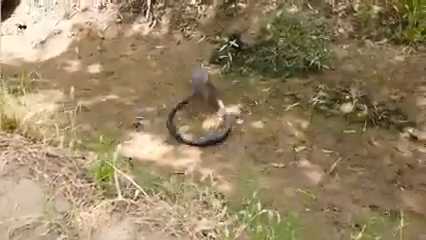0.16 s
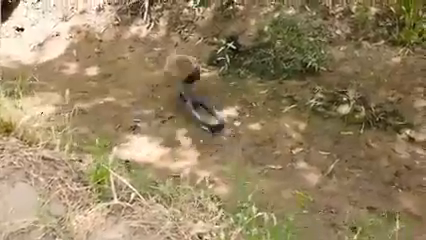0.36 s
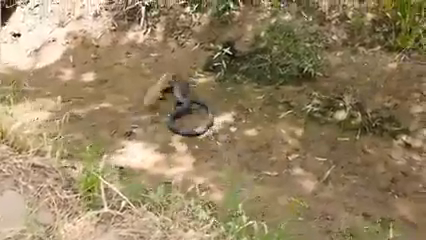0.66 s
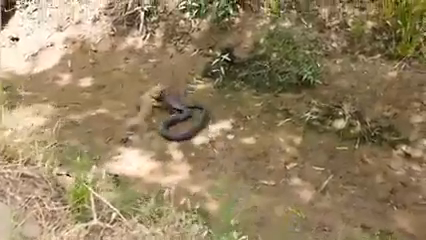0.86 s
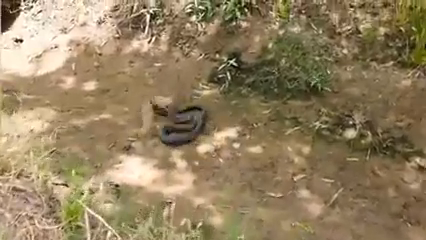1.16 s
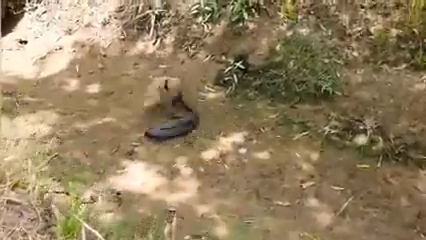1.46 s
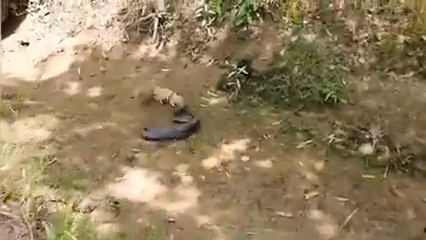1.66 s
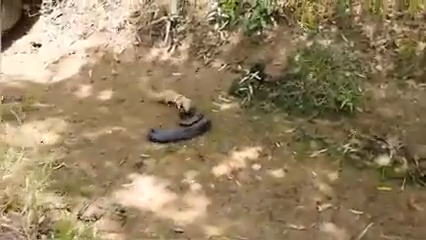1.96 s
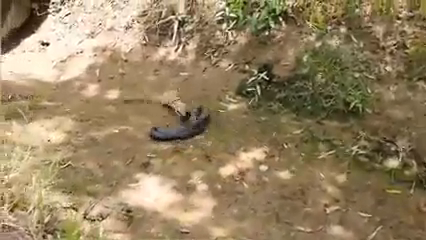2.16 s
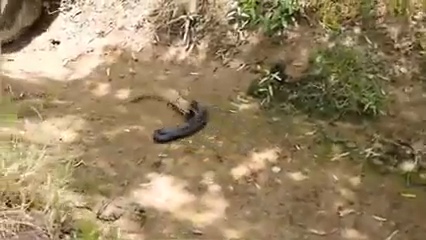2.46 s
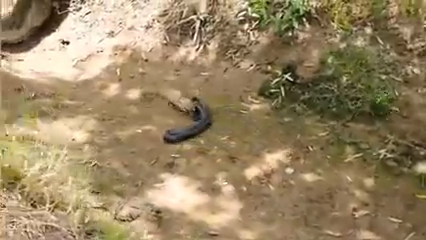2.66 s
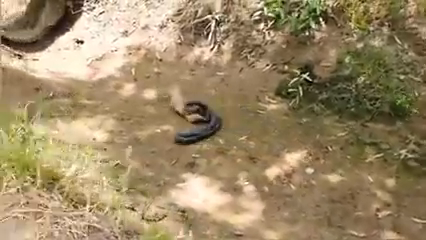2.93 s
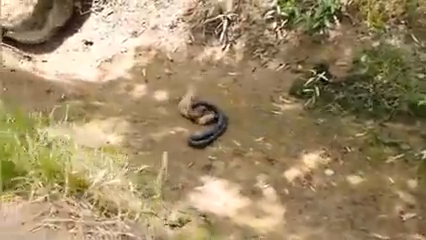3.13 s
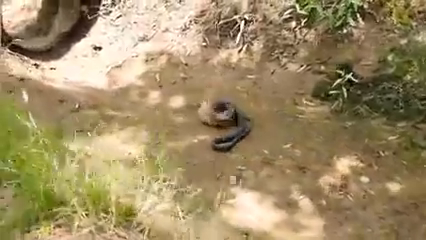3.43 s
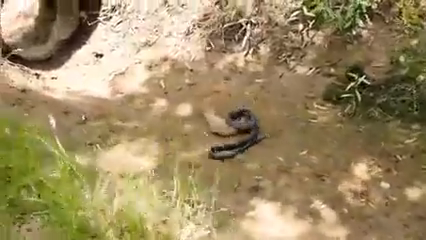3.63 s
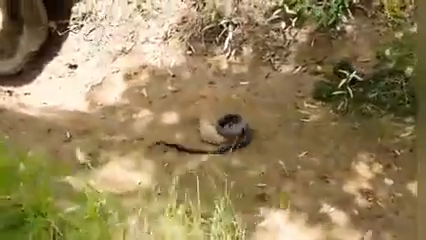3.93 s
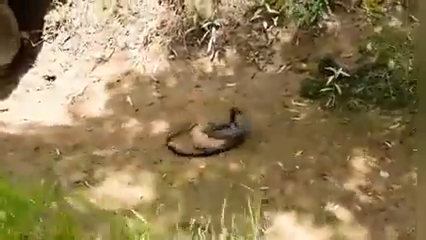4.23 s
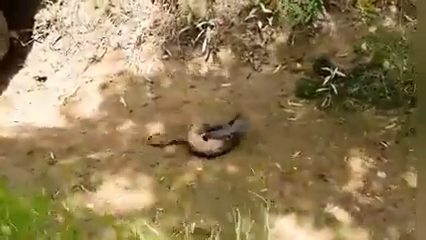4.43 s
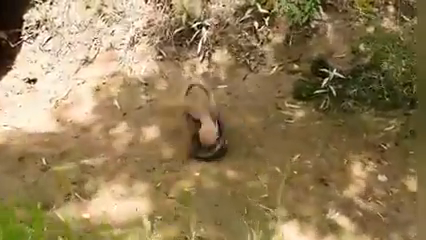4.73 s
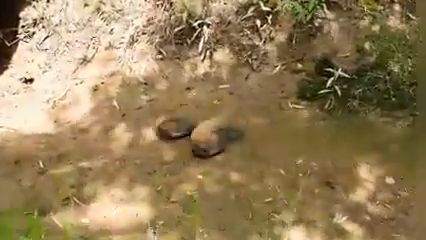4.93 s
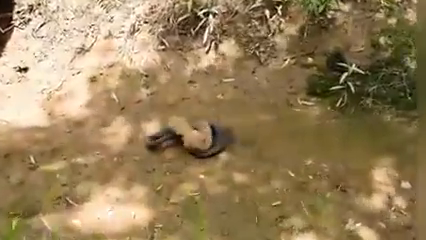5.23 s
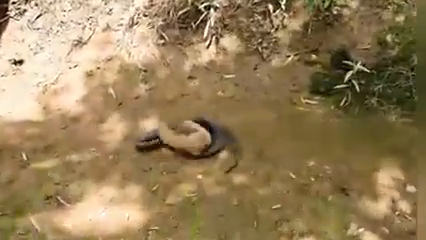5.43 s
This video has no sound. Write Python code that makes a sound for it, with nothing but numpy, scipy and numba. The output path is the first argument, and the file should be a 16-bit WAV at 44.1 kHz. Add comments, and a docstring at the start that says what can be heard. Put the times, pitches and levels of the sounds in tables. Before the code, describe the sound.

A snake hisses five times in sharp, raspy bursts amid light knocks and scuffs of a struggle, with low wind rumble on the microphone.

```python
"""A hissing snake wrestles a small animal

A snake a few metres off hisses five times: rushing air makes its windpipe and moving mouth ring.
The struggle scuffs, knocks and ticks on damp ground. Wind rumbles on the two openings (ports) of a
handheld camera's stereo microphone, which colours left and right unevenly. A steady hush lies behind."""
import sys
import numpy as np
from scipy import signal
from scipy.fft import rfft, irfft
from scipy.io import wavfile
from scipy.ndimage import uniform_filter1d
from numba import njit

SR = 44100
rng = np.random.default_rng(int(sys.argv[2]) if len(sys.argv) > 2 else 0)


def bounce(signal):
    """Save signal as a 16-bit WAV file at the path given by the first command-line argument."""
    frames = np.transpose(np.atleast_2d(signal))
    limited = np.clip(frames, -1, 1)
    pcm = np.round(limited * 32767).astype(np.int16)
    wavfile.write(sys.argv[1], SR, pcm)


N = 246519


def snake():
    """Air rushing through the glottis (the windpipe's opening) rings windpipe, throat, mouth and lung."""
    # one curve a hiss: t/s, windpipe level/dB, throat/dB, mouth f/Hz, mouth/dB, air jet/dB
    # (throat, mouth and jet levels are relative to the windpipe)
    breaths = [
        [(0.175, -31, 4, 6570, -5, -10), (0.183, -29, 8, 7060, 8, 9), (0.323, -36.5, 16, 7480, 9.5, 18.5),
         (0.367, -32, 14.5, 7330, 5, 7.5), (0.395, -45, 23.5, 7190, 10.5, 18), (0.419, -28.5, 0.5, 6980, -1, 1),
         (0.457, -27.5, 5, 6950, -6, -10), (0.483, -40.5, 17, 7090, 8, 0), (0.529, -32.5, -1, 6800, -11, -15),
         (0.57, -67, 2, 6570, 7, -7)],
        [(0.86, -56.5, 5, 6940, -3, -1), (0.886, -37, -0.5, 7030, -10, -5), (0.936, -31, -0.5, 7230, -4, -7.5),
         (1.024, -33, -1.5, 7770, -11.5, 5), (1.166, -38, -3.5, 7670, 9, 9), (1.3, -33.5, 3.5, 7860, -2, 15),
         (1.354, -50.5, 35, 7430, 19.5, 30), (1.398, -31.5, 3.5, 6620, 8, 5),
         (1.422, -27, 3.5, 6520, -3.5, -24), (1.45, -59.5, 0.5, 6430, -5, 7)],
        [(1.62, -54, -0.5, 6390, -7, 0), (1.736, -19.5, -3.5, 6230, -13, -21),
         (1.75, -30.5, -5.5, 6170, -6, -16), (1.816, -26, -6, 6240, -12, -10.5),
         (1.866, -29.5, -5, 7480, -4, -11), (1.902, -26, -1, 7310, -8.5, -14),
         (2.228, -23.5, -7, 7280, -7.5, -3), (2.276, -27, -17, 7500, -3, -8), (2.284, -34.5, -4, 7390, -11, -9),
         (2.31, -68, 4, 7330, 8, 15)],
        [(3.213, -51, 0, 6000, -3, -5.5), (3.241, -37.5, 2, 6490, 2, -7), (3.285, -32, -5.5, 7170, 2.5, 1),
         (3.311, -36, -1, 7550, 7.5, 3), (3.351, -33.5, 3.5, 7510, -5, -10), (3.413, -36, 8, 6000, 4, -6),
         (3.459, -32.5, 6.5, 6000, -4.5, -4.5), (3.513, -37, 9, 6680, -1, -4),
         (3.593, -32, -3, 6600, -7.5, -18), (3.625, -63.5, 4, 6810, -7, -17)],
        [(5.125, -60, 0, 6180, 3, -11), (5.141, -46, 4, 6300, -13, -29), (5.157, -39.5, 4, 6440, -0.5, -22),
         (5.217, -29, -1, 6900, -1.5, -20), (5.289, -28.5, -7, 7340, -1, -14),
         (5.441, -29.5, -2.5, 7370, 0, -8.5), (5.505, -32.5, 7, 7630, 0.5, 0),
         (5.519, -33.5, -2, 7530, -17, -22), (5.533, -59.5, 10, 7530, 6, 5), (5.545, -51, 2, 7480, -7, -7)],
    ]
    # one row a hiss, each entry spread evenly over it: windpipe f/Hz, throat f/Hz, air jet f/Hz
    airway_pitches = [((2150, 2050, 1700, 2100, 2250), (3850, 3750, 3450, 3400, 2650), (12600, 12000)),
                      ((1900, 1850, 2000), (2650, 2620, 2880), (11800, 13900)), ((1850, 1760, 1740),
                      (2680, 2550, 2400), (12300, 11900)), ((1900, 1740, 2050), (2800, 2640, 2540),
                      (12200, 12200)), ((2230, 2030, 2120), (3300, 3200, 3300), (12400, 12200))]
    # one row a hiss: lowest windpipe ring/dB, upper windpipe ring/dB, depth of the raspy flutter/dB
    voicings = [(-8.5, -8, 2), (-20, -3.5, 0.74), (-13.5, -14.5, 0.55), (-12, -12.5, 1.2), (-17, -15, 0.46)]
    # the hollow lung, changing shape as the body coils; one curve a hiss: t/s, level/dB, f/Hz
    lung = [
        [(0.175, -66, 522), (0.195, -40.5, 490), (0.301, -56, 516.5), (0.453, -55, 482), (0.489, -50, 731),
         (0.57, -58, 451)],
        [(0.86, -56, 643), (0.904, -50.5, 740), (1.336, -51.5, 437), (1.388, -46.5, 448), (1.426, -54, 760),
         (1.45, -79, 756)],
        [(1.62, -46, 660), (1.638, -53.5, 592), (1.892, -54.5, 480), (2.076, -57, 632), (2.252, -53.5, 557),
         (2.31, -66, 560)],
        [(3.213, -55, 498), (3.237, -52.5, 452), (3.403, -57, 724), (3.483, -40.5, 787), (3.603, -56, 591),
         (3.625, -76, 605)],
        [(5.125, -58, 460), (5.151, -53.5, 455), (5.343, -55.5, 592), (5.405, -52.5, 479.3), (5.519, -53, 507),
         (5.545, -80, 507)],
    ]
    # width/Hz of each ring: windpipe, throat, mouth, air jet
    widths = (330, 620, 1700, 4200)
    pipe_width, throat_width, mouth_width, jet_width = widths
    t = np.arange(N) / SR
    airways, hissing = [], np.zeros(N)
    for breath, (pipe, throat, jet), voicing in zip(breaths, airway_pitches, voicings):
        start, end, steps = breath[0][0], breath[-1][0], len(pipe)
        times, jet_glide = np.linspace(start, end, steps), np.linspace(*jet, steps)
        airways.append(np.column_stack([times, pipe, throat, jet_glide, np.tile(voicing, (steps, 1))]))
        hissing += (t >= start) & (t <= end)
    gate = uniform_filter1d(hissing, int(0.0023 * SR))
    db, throat_db, mouth_hz, mouth_db, jet_db = curves(breaths)
    pipe_hz, throat_hz, jet_hz, low_db, upper_db, rasp_db = curves(airways)
    lung_db, lung_hz = curves(lung)
    jet_hz += 0.2 * (mouth_hz - 7000)  # a narrower mouth raises the jet's pitch
    close, loose = .88, .62  # likeness at the ports: bouncing off the ground makes the treble less alike
    hiss = band(noise(close), pipe_hz * (1 + .025 * wander(25)), pipe_width)
    hiss += band(noise(close), 1695, 620) * gain(low_db)
    hiss += band(noise(close), throat_hz * (1 + .035 * wander(30)), throat_width) * gain(throat_db)
    mouth = band(noise(loose), mouth_hz * (1 + .03 * wander(14)), mouth_width)
    hiss += mouth * gain(mouth_db + 1.5 + 0.955 * wander(21.27))
    hiss += band(noise(loose), 1.27 * mouth_hz, mouth_width) * gain(mouth_db - 9)  # second mouth ring
    hiss += band(noise(close), 3760, 1200) * gain(throat_db / 2 + upper_db)
    hiss += band(noise(loose), jet_hz, jet_width) * gain(jet_db + 0.5 * wander(28))
    hiss += band(noise(loose), 15000, 5000) * gain(jet_db - 11.5 + 1.3 * wander(12))  # the jet's sizzle
    hiss += band(noise(loose), 6500, 15000) * gain((mouth_db + jet_db) / 2 - 2)  # broad rush
    # the open windpipe gives off no low sound
    hiss = signal.sosfilt(signal.cheby1(8, .8, 1304, "high", fs=SR, output="sos"), hiss)
    hiss += band(noise(close), lung_hz, 300) * gain(lung_db - 1 - db)
    hiss += band(noise(close), 650, 800) * gain(lung_db - 5 - db)  # broad wash round the lung's ring
    hiss -= band(hiss, 1060, 900, scale=False)  # the glottis swallows a band between lung and windpipe
    return gate * gain(db + rasp_db * wander(90)) * hiss


def wheezes():
    """Faint, thin air slips through a nearly shut glottis, gliding in pitch."""
    # wheezes: t/s, length/s, level/dB, start f/Hz, end f/Hz
    glides = [(2.359, .13, -66.5, 5140, 5930), (2.556, 0.067, -66, 5000, 5800),
              (2.609, 0.081, -62, 6220, 7700), (4.139, .09, -61, 5800, 7200),
              (4.513, 0.097, -48, 7560, 6540)]
    level, hz = 0, np.full(N, 6000.)
    for start, length, db, start_hz, end_hz in glides:
        shape, progress = swell(start, length, rise=0.44)
        level += gain(db) * shape
        hz = np.where(progress > 0, start_hz + progress * (end_hz - start_hz), hz)
    return level * band(noise(0.11), hz, 1950)


def knocks():
    """Each blow of the struggle is a hollow thud, a higher, rough snap and a noisy tick."""
    # blows: t/s, thud level/dB, thud f/Hz, time to fade by 60 dB/s, snap/dB, tick/dB (both over the thud)
    blows = [(0.391, -36, 510, 0.039, 11.5, 8), (0.544, -31, 320, 0.021, -12, -11),
             (0.569, -34, 454, .03, -23, -20), (0.612, -38, 450, 0.026, -18, -30),
             (0.626, -26.5, 460, 0.048, -39, -30), (0.736, -53, 353, 0.012, 16.5, -4),
             (0.766, -52, 301, 0.02, -1, -21.5), (2.598, -53.5, 301, .035, -7.5, 17),
             (2.889, -63, 619, 0.034, 22, -4.5), (3.108, -68, 526, .035, 17.5, 0),
             (3.816, -56.5, 471, .05, 2.5, -5), (3.841, -29, 296, 0.013, -15.5, -15.5),
             (3.93, -32, 1000, 0.011, -21, -4.5), (4.202, -59.5, 301, 0.028, 11.5, 16),
             (4.639, -44, 300, 0.019, -1, -4.5), (4.66, -39, 577, .022, -13, -10),
             (4.695, -29, 423, 0.022, -18, -10.5), (4.731, -62, 400, .03, -6, 8),
             (4.767, -31, 352, 0.018, -2, -17), (4.866, -23.5, 630, 0.013, -13, -32),
             (4.934, -44, 375, 0.027, 0, 10.5)]
    snap_hz = 2070
    track, t = np.zeros(N + 4096), np.arange(4096) / SR
    for start, db, hz, fade_s, snap_db, tick_db in blows:
        grit = rng.standard_normal(len(t))
        shape = np.exp(-np.log(1000) * t / fade_s) * np.minimum(t / (0.054 * fade_s), 1)
        rough = 1.3 + 3.5 * uniform_filter1d(grit, size=12)
        thud = np.sin(2 * np.pi * hz * t) * shape
        snap = np.sin(2 * np.pi * snap_hz * t) * rough * shape ** 0.98
        tick = np.diff(uniform_filter1d(grit, size=2), prepend=0) * np.exp(-t / .001)
        at = int(start * SR)
        track[at:at + len(t)] += gain(db) * (thud + gain(snap_db) * snap + gain(tick_db) * tick)
    return np.array([track[:N], track[:N]])


def scuff():
    """Grainy scuffs on the ground, and the short tail that each hiss leaves as it stops."""
    # scuffs and hiss tails: t/s, length/s, dull level/dB, bright over dull/dB
    bursts = [(0, 0.082, -67, 0), (0.103, 0.087, -74, 20.5), (0.554, 0.051, -62, 2.5),
              (0.712, 0.039, -74, 0), (1.423, 0.14, -61.5, 8), (1.55, 0.24, -57, 4),
              (1.626, 0.069, -37.5, -7.5), (2.274, 0.092, -64.5, 13.5), (2.422, 0.13, -59.5, -16),
              (2.582, 0.093, -77.5, 12), (2.736, 0.51, -63.5, 10.5), (3.587, 0.067, -58, 3),
              (3.805, 0.17, -48, -11.5), (4.153, 0.083, -72, -4.5), (4.577, 0.43, -61, 1),
              (4.84, 0.23, -55.5, -6), (5.088, 0.24, -52.5, -4.5), (5.499, 0.077, -57, 9)]
    dull, bright = gain(-67.5), gain(-92.5)  # slow shifting that never quite stops
    for start, length, db, bright_db in bursts:
        burst = gain(db) * swell(start, length, rise=0.22)[0]
        dull += burst
        bright += burst * gain(bright_db)
    grain = gain(1.6 * wander(220))
    return grain * (dull * band(noise(0.12), 1220, 2200) + bright * band(noise(0.2), 9500, 24000))


def wind():
    """Air swirling at the ports makes a wandering rumble, a deeper heave and sharper buffets."""
    # the breeze: t/s, level/dB
    breeze = [(0.0, -49), (1.67, -48.5), (1.93, -38.5), (2.35, -46.5), (3.03, -49), (3.64, -40),
              (3.86, -48), (4.56, -49.5), (4.9, -40.5), (5.14, -46), (5.39, -52.5), (5.59, -35.5)]
    # gusts on the ports: t/s, length/s, level/dB, buffet over it/dB, left minus right/dB
    gusts = [(0.529, 0.037, -44.5, -12, 15.5), (1.62, 0.083, -50, 4.5, -13), (1.647, 0.16, -40.5, -32, -24),
             (1.839, 0.06, -38, -7.5, -35), (1.948, 0.25, -30, -30, -5.5), (2.079, .1, -38.5, 8, -2),
             (2.359, 0.1, -33.5, -10, -12), (2.554, .11, -35.5, -3, 10.5), (3.017, 0.083, -40, -29, -3.5),
             (3.258, 0.051, -57, -5, -1), (3.639, 0.16, -39.5, -22.5, -13.5), (3.775, 0.13, -39, -6, -4),
             (4.69, 0.19, -44, -3.5, -18), (4.817, 0.076, -35, -22, -7), (4.99, 0.1, -36.5, -31, 11),
             (5.355, 0.061, -43.5, 7.5, 5.5), (5.427, 0.17, -38, -9, -4.5)]
    low = gain(curves([breeze])[0] + 2.5) * np.ones((2, 1))
    sharp = low * gain(-23.5)
    for start, length, db, buffet_db, pan_db in gusts:
        gust = swell(start, length, rise=0.3)[0] * gain(db + np.array([[pan_db], [-pan_db]]) / 2)
        crest = swell(start, length, rise=0.28)[0] ** 4
        low = np.hypot(low, gust)
        sharp = np.hypot(sharp, gust * crest * gain(buffet_db + 1))
    alike = .4 - 0.06 * abs(20 * np.log10(low[0] / low[1]))  # a one-sided gust makes the ports less alike
    rumble = band(noise(alike), 71.8 * (1 + 0.21 * wander(6)), 30.8)
    heave = band(noise(alike), 34.5, 31) * gain(-2.5)
    buffet = band(noise(alike), 134.3, 58.4) * gain(3.2 * wander(29))
    return low * (rumble + heave) + sharp * buffet


def air():
    """Steady outdoor hush, alike at both ports only in the bass."""
    # tone of the hush: f/Hz, relative level/dB
    spectrum = [(120, -39), (200, -21), (340, -7), (569, -10.5), (709, -21), (1100, -9), (1180, -20.5),
                (2050, -13.5), (2700, -25), (16000, -28.5)]
    points_hz, points_db = np.transpose(spectrum)
    hz = np.arange(N // 2 + 1) * SR / N + 1
    colour = gain(np.interp(np.log(hz), np.log(points_hz), points_db))
    mid, side = rfft(rng.standard_normal((2, N))) * colour
    side *= np.minimum(hz / 1200, 1)
    hush = unit(irfft(np.array([mid + side, mid - side]), N))
    return hush * gain(-59.5 + 0.27 * wander(4))


def stereo_colour(sound):
    """The stereo microphone lifts three bands on the left, dips them on the right and shifts the phase."""
    # the bands: f/Hz, width/Hz, height/dB (the left gains a share, the right loses one)
    bands = [(2440, 690, 25), (7150, 2900, 14), (12800, 2000, 7.5)]
    # how far the left wave runs ahead: f/Hz, phase/radians
    left_lead = [(0, 0), (1500, .4), (2600, -.2), (4600, -3.2), (7500, -5), (9000, -6.3), (10600, -9.2),
                 (16000, -11)]
    hz = np.arange(N // 2 + 1) * SR / N
    lift_db = sum(db * np.exp(-((hz - centre) / width) ** 2) for centre, width, db in bands)
    lead = np.interp(hz, *np.transpose(left_lead))
    left, right = rfft(sound)
    left *= gain(0.17 * lift_db) * np.exp(1j * lead)
    right *= gain(-.4 * lift_db)
    return irfft(np.array([left, right]), N)


def gain(db):
    """Turn decibels into a multiplier."""
    return 10 ** (np.asarray(db) / 20)


def unit(x):
    """Scale to an average (rms) level of 1."""
    return x / np.sqrt(np.mean(x ** 2))


@njit
def resonate(x, hz, width):
    """A state-variable filter: it passes the sound near a moving centre pitch."""
    y, band_state, low_state = np.empty(len(x)), 0., 0.
    for i in range(len(x)):
        tuning, damping = np.tan(np.pi * hz[i] / SR), width / hz[i]
        ring = (band_state + tuning * (x[i] - low_state)) / (1 + tuning * (tuning + damping))
        band_state = 2 * ring - band_state
        low_state += 2 * tuning * ring
        y[i] = damping * ring
    return y


def band(x, hz, width_hz, scale=True):
    """Filter each channel twice for a steep ring around hz, scaled to level 1 if asked."""
    hz, width_hz = np.clip(hz * np.ones(N), 20, .45 * SR), float(width_hz)
    y = np.array([resonate(resonate(channel + 1e-18, hz, width_hz), hz, width_hz) for channel in x])
    return unit(y) if scale else y


def noise(alike):
    """Noise at the two ports, from unrelated (alike = 0) to identical (1)."""
    alike = np.clip(alike, 0, 1)
    mid, side = rng.standard_normal((2, N))
    return np.sqrt(1 + alike) * mid + np.sqrt(1 - alike) * side * np.array([[1], [-1]])


def wander(rate_hz):
    """A smooth random wobble of typical size 1, with rate_hz new values a second."""
    hold = int(SR / rate_hz)
    steps = np.repeat(rng.standard_normal(N // hold + 1), hold)
    return unit(uniform_filter1d(uniform_filter1d(steps, hold), hold)[:N])


def curves(tables):
    """Join tables that start with a time column; draw each other column out to one value a sample."""
    times, *columns = np.vstack(tables).T
    return [np.interp(np.arange(N) / SR, times, column) for column in columns]


def swell(start, length, rise):
    """A 0-1 shape that climbs for the share `rise` of its length, then falls; also its progress, 0-1."""
    progress = np.clip((np.arange(N) / SR - start) / length, 0, 1)
    return np.sin(np.pi / 2 * np.minimum(progress / rise, (1 - progress) / (1 - rise))), progress


def scene():
    """The microphone colours the struggle; wind and hush are added at its ports."""
    return stereo_colour(snake() + wheezes() + scuff() + knocks()) + wind() + air()


def record(dry):
    """The camera rounds the loudest peaks and cuts the highest treble."""
    top_hz = 16150
    rounded = np.tanh(1.1 * dry) / 1.1
    return signal.sosfilt(signal.ellip(10, .2, 80, top_hz, fs=SR, output="sos"), rounded)


dry = scene()
out = record(dry)
bounce(out)
```